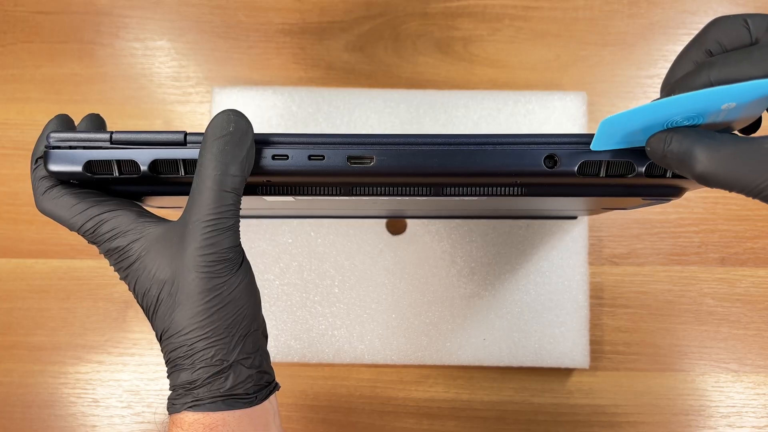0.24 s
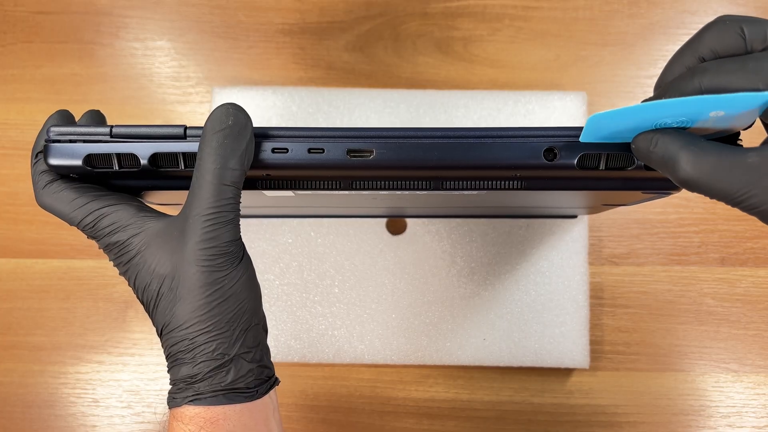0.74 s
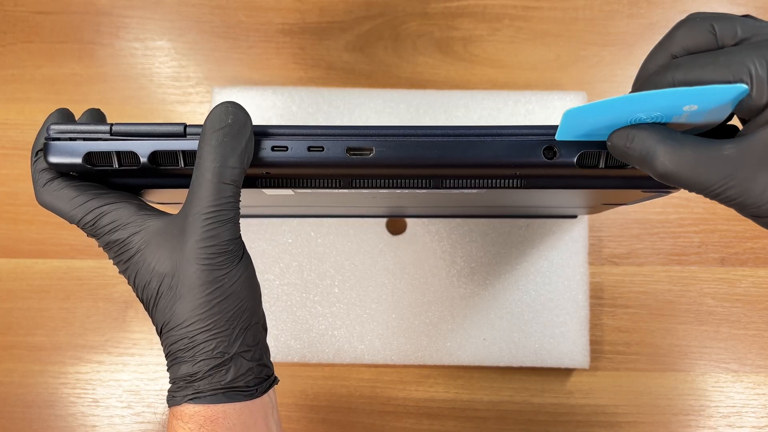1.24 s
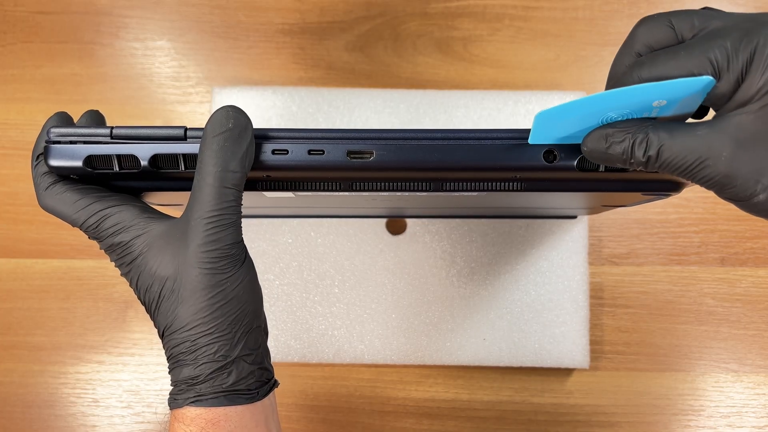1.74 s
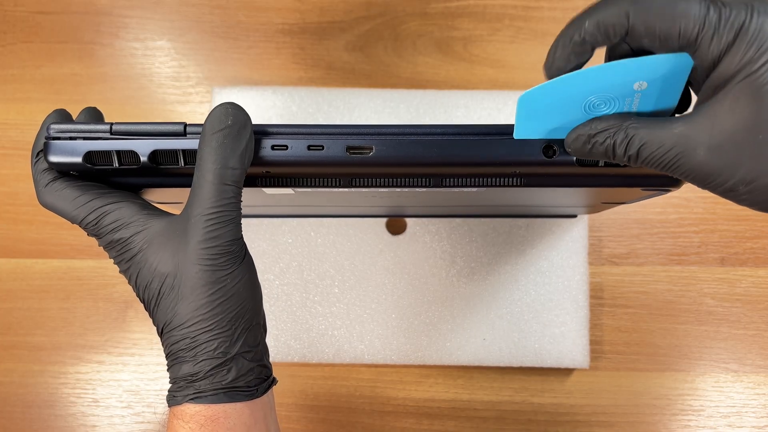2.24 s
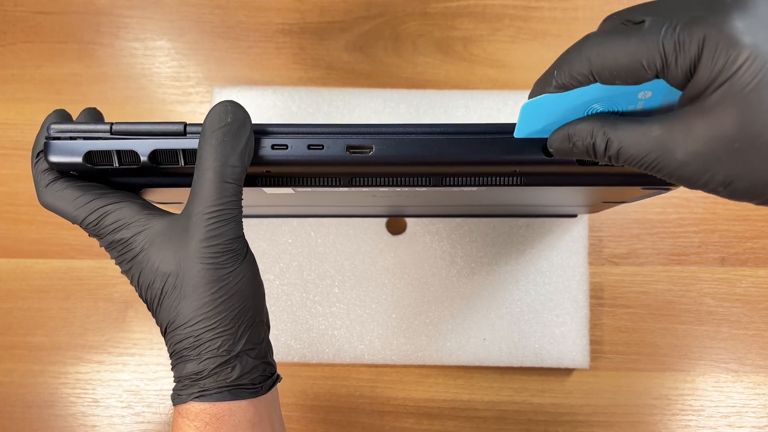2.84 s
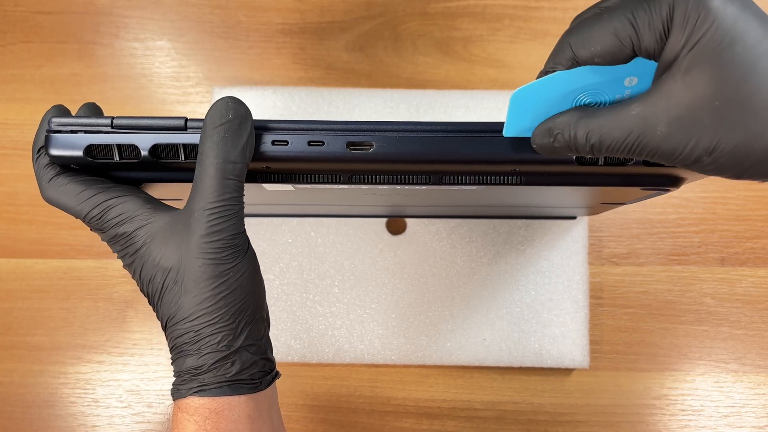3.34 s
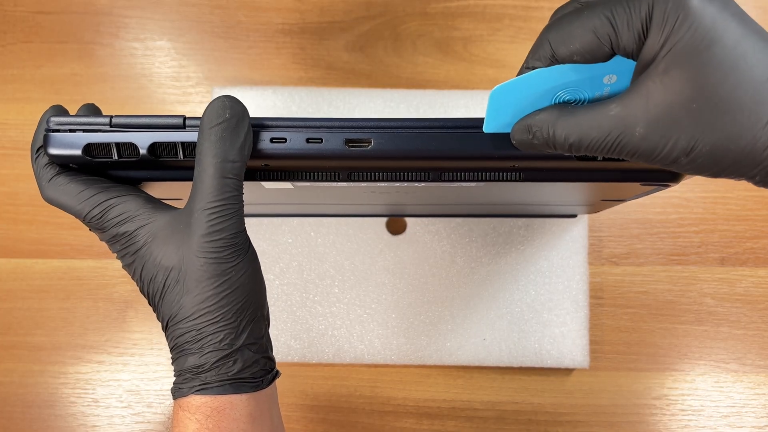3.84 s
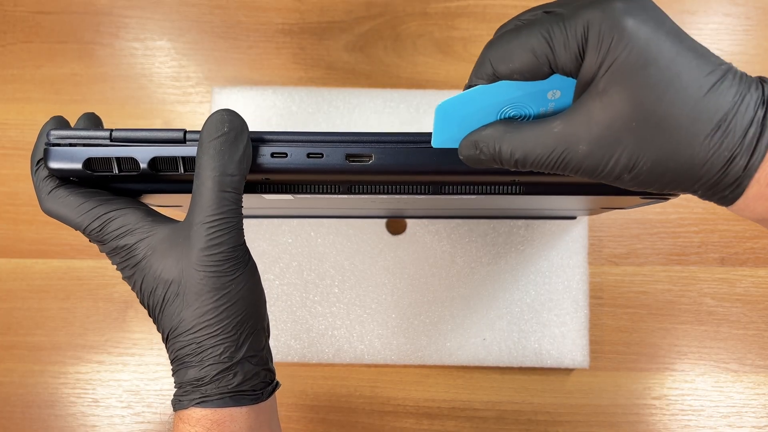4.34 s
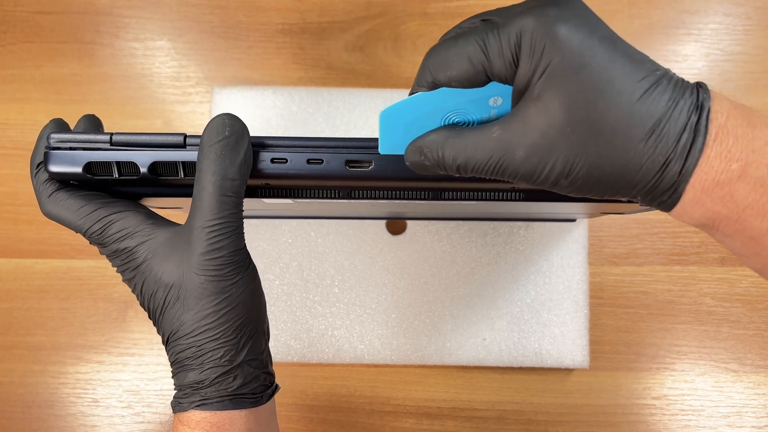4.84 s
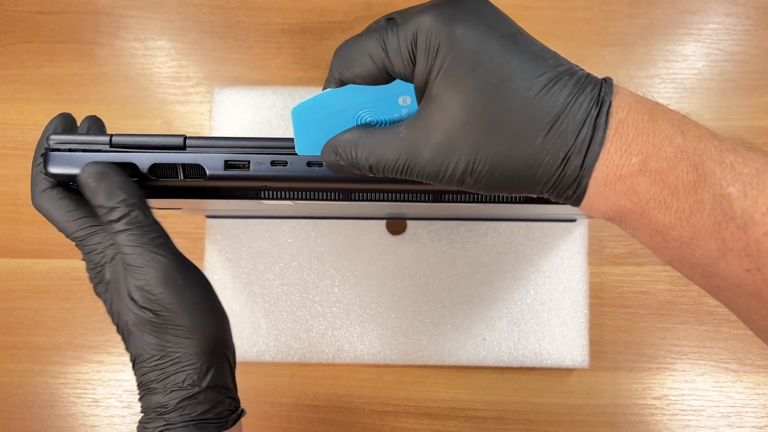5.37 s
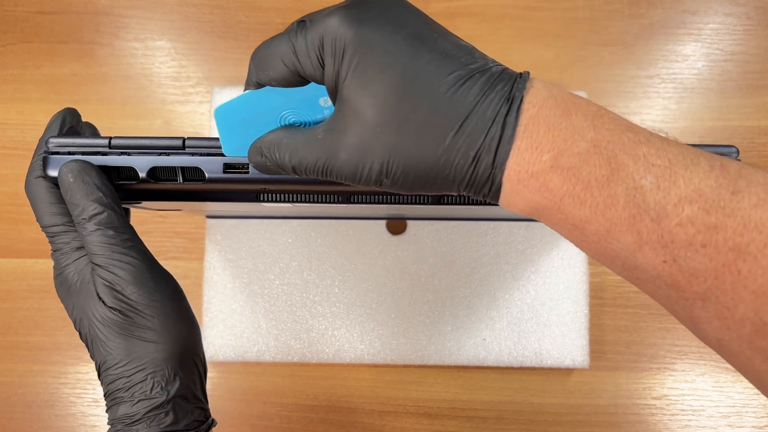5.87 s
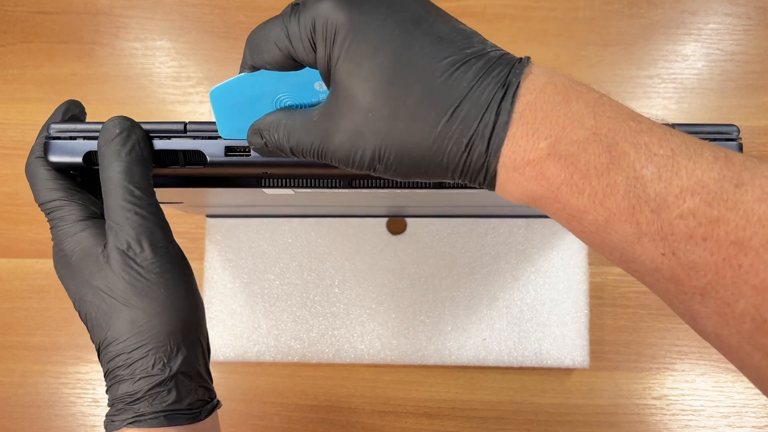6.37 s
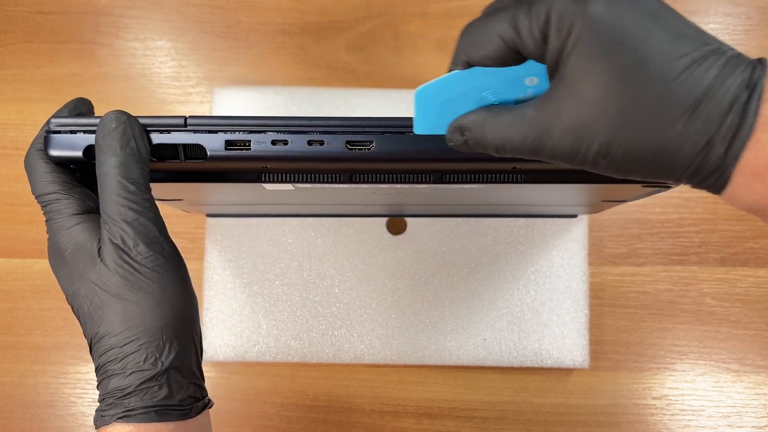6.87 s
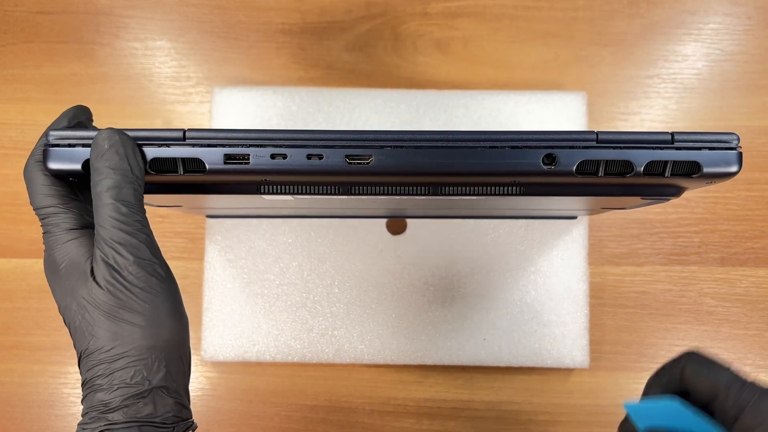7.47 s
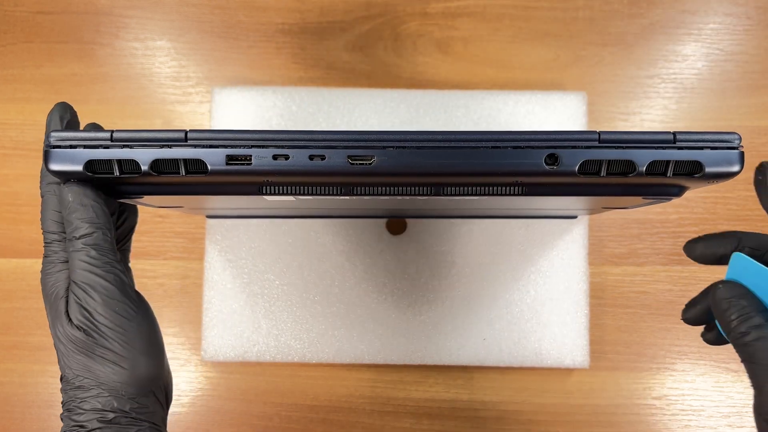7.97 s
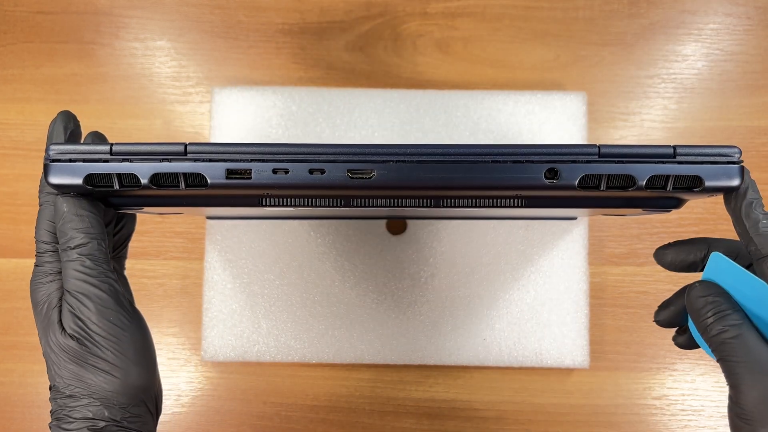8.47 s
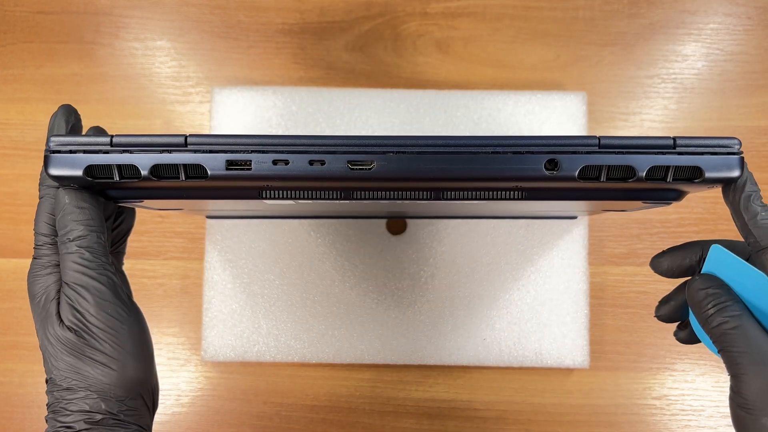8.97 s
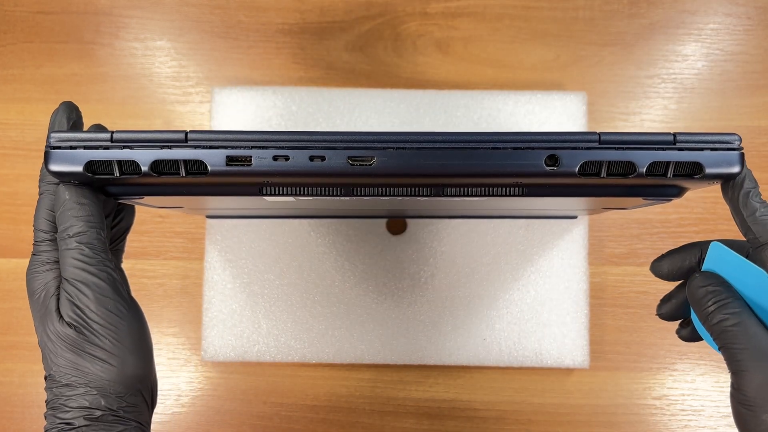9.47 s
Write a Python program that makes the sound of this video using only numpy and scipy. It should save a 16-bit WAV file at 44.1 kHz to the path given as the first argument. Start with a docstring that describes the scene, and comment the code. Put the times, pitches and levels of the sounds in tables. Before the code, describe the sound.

Quiet room tone and light ticks open the scene, with gritty rubbing of plastic, rubber gloves and foam. Clips burst loose in a rapid loud volley, followed by separate hard snaps, the strongest distorting the close microphone and echoing in the room. A short stuttering scrape follows, then rustling dwindles almost to stillness.

```python
"""A plastic pry tool works along the seam of a laptop that stands on foam on a desk, in a bare, lively room.
Room tone and faint friction of resting hands (filtered noise) run throughout; from the start the tool ticks,
and strokes of gritty noise scrape in the seam, rustle as rubber gloves and drag on the foam. Clips snap loose
from 0.48 s, loudest at 3.4, 4.9 and 5.6 s: noise bursts in a resonant shell excite decaying modes and a room
tail, and the loudest are flattened at their peaks. From 6.4 to 7 s the blade chatters; then ever fainter
strokes remain."""
import sys
import numpy as np
from scipy import signal
from scipy.fft import rfft, irfft, next_fast_len
from scipy.io import wavfile
from scipy.ndimage import uniform_filter1d, map_coordinates

SR = 44100
rng = np.random.default_rng(int(sys.argv[2]) if len(sys.argv) > 2 else 0)


def output_pcm(signal):
    """Save a mono or channel-first signal as 16-bit PCM at the path in sys.argv[1].

    Samples are clipped to [-1, 1] before scaling.
    """
    pcm = np.clip(np.atleast_2d(signal).T, -1, 1) * 32767
    wavfile.write(sys.argv[1], SR, np.round(pcm).astype(np.int16))


N = 428211

# Room tone spectrum: (frequency [Hz], relative density [dB per Hz])
AIR_SPECTRUM = [(15, -64), (25, -41.5), (97, -6.5), (130, -4), (170, -16.5), (206, -1.5), (285, -6.5),
                (363, -7.5), (416, -10), (489, -11.5), (714, -12.5), (796, -17), (1130, -28.5), (3620, -28),
                (16000, -39.5)]
AIR_DB = -68

# Strokes of sliding contact, levels before the mix:
# (full level from [s], hold [s], tool scrape [dB], glove rustle [dB], case on foam [dB])
STROKES = [(0.11, 0.044, -71, -94, -56.5), (0.64, 0.01, -77, -92, -64.5), (0.86, 0.0099, -73, -71, -62),
           (1.0, 0.083, -74, -76, -70), (1.18, 0.029, -77, -73, -69), (1.365, 0.0046, -57.5, -56, -64),
           (1.52, 0.013, -69, -73, -59.5), (1.61, 0.087, -64, -62.5, -63), (1.8, 0.016, -69, -62.5, -60),
           (1.89, 0.019, -63, -58.5, -57.5), (2.0, 0.037, -63, -58.5, -58), (2.136, 0.11, -63, -49.5, -65),
           (2.25, 0.021, -47.5, -40.5, -56.5), (2.46, .05, -57, -56.5, -85),
           (2.54, 0.018, -50.5, -57.5, -57.5), (2.734, .02, -59.5, -56.5, -71),
           (2.86, 0.022, -52, -49, -51), (3.016, 0.064, -60, -67, -53.5), (3.17, .01, -68, -60, -79),
           (3.325, 0.014, -59.5, -58, -72), (3.682, 0.0047, -55.5, -56, -47.5),
           (3.814, 0.0056, -55.5, -68.5, -52), (4.04, 0.015, -48.5, -55.5, -54),
           (4.13, 0.037, -54, -62, -53), (4.23, 0.069, -56.5, -62, -60.5), (4.46, 0.082, -51, -55.5, -59.5),
           (4.7, 0.3, -54, -73.5, -49.5), (5.0, 0.24, -46, -52.5, -50), (5.11, 0.025, -40.5, -45, -53),
           (5.28, 0.026, -57.5, -43, -67.5), (5.35, 0.011, -57.5, -60, -69), (5.43, .12, -55.5, -52.5, -71),
           (5.59, .03, -49.5, -47.5, -46), (6.2, 0.06, -68.5, -53, -68), (6.33, 0.19, -75, -55.5, -67.5),
           (6.55, 0.13, -47, -47, -50), (6.68, 0.27, -50.5, -50.5, -55.5), (6.92, 0.072, -41, -44, -53),
           (7.11, 0.044, -51, -49, -56), (7.18, 0.054, -61.5, -55, -63.5), (7.43, 0.044, -56.5, -47, -70),
           (7.5, 0.064, -53.5, -54, -69.5), (7.58, 0.048, -48.5, -47.5, -71), (7.66, .1, -54.5, -53, -64.5),
           (7.84, 0.036, -68, -58.5, -69), (7.9, 0.054, -62.5, -48.5, -68.5),
           (8.12, 0.022, -72.5, -64.5, -74.5), (8.29, 0.024, -73, -66, -74.5),
           (8.44, 0.008, -74.5, -74.5, -73), (8.5, .08, -71.5, -79, -67.5), (8.87, .03, -71, -79.5, -77),
           (9.15, 0.019, -69.5, -90.5, -71), (9.44, 0.018, -75, -74.5, -73.5),
           (9.515, 0.062, -74.5, -80.5, -65)]
# Hands at rest on the case, before the mix, one row each for scrape, rustle and foam: (level [dB])
REST_DB = [
    [-78],
    [-85.5],
    [-79.5],
]
RISE_DB_PER_S, FALL_DB_PER_S = 351, 218  # into and out of a stroke
FLUTTER_DB, FLUTTER_PER_S = 1.5, 25  # unsteady pressure inside a stroke

# Friction spectra of foam, tool and gloves: (frequency [Hz], relative density [dB per Hz])
FOAM_SPECTRUM = [(80, -25), (200, -10), (600, 1), (1200, -3), (2000, -14.5), (4000, -32)]
SCRAPE_SPECTRUM = [(300, -25.5), (800, -10.5), (1500, 0.5), (2500, -1.5), (5000, -8.5), (9000, -23.5)]
RUSTLE_SPECTRUM = [(1500, -33.5), (3500, -1.5), (6000, 2.5), (10000, 1.5), (16000, -3.5)]
# Rumble through foam and desk: (frequency [Hz], relative density [dB per Hz])
RUMBLE_SPECTRUM = [(25, -7), (60, 0), (120, 0.5), (300, -8), (600, -28)]

# Decay of the room: (frequency [Hz], t60 [s])
ROOM_T60 = [(100, 0.72), (400, 0.34), (1100, 0.49), (3000, 0.47), (7700, 0.41), (11000, 0.48),
            (16000, 0.38)]
# Colour of the echo: (frequency [Hz], relative level [dB])
WALL_COLOUR = [(100, 0.5), (500, -1), (1200, 0), (4000, -3), (6000, -2.5), (9000, -2), (12000, -5),
               (16000, -4.5)]

# The tool's edge ticking on the case; treble and thump are relative to the burst:
# (time [s], burst peak [dB], pitch [Hz], treble [dB], thump [dB])
TICKS = [(0.036, -47.5, 1820, 0, -24), (0.111, -38.5, 1240, -32, -38), (0.279, -49.5, 1200, 3.5, -7),
         (0.444, -47.5, 1040, 0, -19), (0.544, -45.5, 1050, -14, -1.5), (1.686, -38.5, 1560, -9, -15),
         (1.798, -47.5, 1410, -13, -30), (1.897, -37.5, 1530, -6, -13), (2.136, -42.5, 1070, 1, -10.5),
         (2.202, -48, 5900, -11, -30), (2.221, -44, 4040, 12, -26), (2.27, -37.5, 2340, -2, -32),
         (2.454, -45.5, 3970, 10, -34), (2.806, -37.5, 3950, 0, -4), (2.811, -31, 1280, -0.5, -11),
         (2.853, -35, 1650, -5, -23), (2.897, -54, 1600, -5, -21), (3.064, -68, 902, -16, -20),
         (3.665, -28, 1010, -19, -34), (3.68, -26, 1710, -14, -43.5), (3.814, -35.5, 2440, -11, -21),
         (5.267, -47.5, 3194, -1.5, -36.5), (5.321, -42.5, 5700, 8, -41.5), (5.42, -43, 6130, 10, -22),
         (6.313, -54, 6000, 11, -27), (6.505, -38.5, 1650, -5, -45), (6.516, -27, 1690, 1, -22.5),
         (6.543, -29.5, 1650, -8, -11), (6.604, -33, 1660, -9, 0.5), (6.845, -34.5, 1700, -13, -9),
         (6.858, -33, 1700, -8, -15), (6.89, -27, 1590, -7.5, -28), (6.921, -27.5, 1540, -21, -38),
         (6.98, -37, 1880, 10.5, -42), (7.009, -27, 2280, -7, -18.5), (7.199, -42.5, 2130, 5.5, -32),
         (7.446, -39, 3330, 1.5, -27), (7.474, -45, 4990, 1, -33), (7.583, -44, 2530, 7, -33),
         (7.942, -42, 1885, -8, -28.5), (8.019, -53, 5800, 10, -27.5), (8.147, -47, 1865, -22, -28.5),
         (8.308, -54.5, 4300, 11.5, -22), (8.6, -57, 1895, -18, -22.5), (9.16, -57.5, 1795, -20, -24),
         (9.52, -56.5, 1197, -17.5, -19)]
TICK_ROOM_DB, TICK_MS, TICK_PANEL_DB = 10.5, 16.3, -24  # the same for every tick
# Clips letting go; every level after the burst peak is relative to it: (time [s], burst peak [dB],
# pitch [Hz], treble [dB], thump [dB], room [dB], length [ms], panel ring [dB])
SNAPS = [(0.483, -23.5, 1970, -6, -43, 9, 31, -27), (0.489, -28, 1130, -3, -16.5, 20.5, 36, -23),
         (3.352, 2.5, 2000, -3, -26, 14.5, 18, -29), (3.371, 3, 3700, -8.5, -43, 15.5, 12, -27),
         (3.385, -8.5, 2030, -13, -46, 18, 20, -30), (3.418, -1.5, 1670, -3, -30.5, 16, 27.3, -28),
         (4.629, -13, 2225, -42, -18, 11.5, 22, -20.5), (4.837, -12, 2800, -11.5, -23.5, 12.5, 17, -18),
         (4.893, -0.5, 1130, -8.5, -15, 12.5, 16.8, -32.5),
         (5.628, 3.5, 1140, -4.5, -18.5, 21, 13.3, -20.5), (6.615, -24, 1040, -19, -15, 11, 36, -15)]
# Bright crack of an impact: (frequency [Hz], relative density [dB per Hz])
CRACK_SPECTRUM = [(300, -30), (1500, -25.5), (4000, 1.5), (8500, 2), (12000, -3.5), (16000, 0)]
# Modes of the loosened panel, then low modes of desk and room: (frequency [Hz], relative level [dB], t60 [s])
PANEL_MODES = [(1025, 0.5, 0.42), (1120, -1, 0.36), (1280, -7.5, 0.24), (1407, -5, 0.085),
               (1650, -15, 0.32), (1860, -10.5, 0.4), (2053, -13.5, 0.35), (2280, -10, .14)]
DESK_MODES = [(101.44, -13.5, 0.62), (140, -17, 0.61), (217, -23.5, 0.32), (276, -17.5, 0.38),
              (342.4, -12, 0.44), (398.3, -13.5, 0.25), (505, -5.5, 0.086), (632, -14, 0.22),
              (771, -11, 0.31)]

# The blade chatters as it slides back along the seam, before the mix: (full level from [s], hold [s], level [dB])
CHATTER = [(6.43, 0.077, -52.5), (6.505, .015, -39.5), (6.545, 0.015, -36), (6.605, 0.035, -37.5),
           (6.66, .11, -52), (6.79, .08, -46), (6.885, .015, -44), (6.92, 0.071, -35)]
CHATTER_RISE_DB_PER_S, CHATTER_FALL_DB_PER_S = 600.5, 500  # the blade bites and lets go faster
# Blade resonances: (frequency [Hz], width before broadening [Hz], relative level [dB])
BLADE_MODES = [(1680, 39, 9), (2210, 21, -19), (3360, 170, -6.5), (4150, 76, -4), (5040, 150, -5)]

TOP_HZ = 16050  # upper band limit


def amp(db):
    """Amplitude ratio: 20 dB is a factor of ten."""
    return 10 ** (np.asarray(db) / 20)


def unit(x):
    """Normalisation to unit root-mean-square amplitude."""
    return x / np.sqrt(np.mean(x ** 2) + 1e-20)


def along(points, hz):
    """Interpolation of (frequency, value) points on a logarithmic frequency axis."""
    f, v = np.transpose(points)
    return np.interp(np.log(hz + 1), np.log(f + 1), v)


def filtered(x, response):
    """Linear filtering: the spectrum is multiplied by a complex frequency response."""
    size = next_fast_len(len(x) + 4096)
    hz = np.fft.rfftfreq(size, 1 / SR)
    return irfft(rfft(x, size) * response(hz), size)[:len(x)]


def coloured(x, spectrum):
    """Spectral shaping to a given density, at unit root-mean-square."""
    return unit(filtered(x, lambda hz: amp(along(spectrum, hz))))


def resonance(f, hz, width):
    """Damped oscillator: unit response at its natural frequency, falling on either side."""
    return 1j * f * width / (hz * hz - f * f + 1j * f * width)


def room_tone():
    """Stationary background: Gaussian noise shaped to the room's spectrum."""
    return amp(AIR_DB) * coloured(rng.standard_normal(N), AIR_SPECTRUM)


def gains(rows, rise_db_per_s, fall_db_per_s):
    """Exponential swell, hold and fade of each stroke; incoherent strokes add in power."""
    t, power = np.arange(N) / SR, 0
    for start, hold, *db in rows:
        rise = rise_db_per_s * (t - start)
        fall = fall_db_per_s * (start + hold - t)
        shape_db = np.minimum(np.minimum(rise, fall), 0)
        power = power + np.outer(amp(db), amp(shape_db)) ** 2
    knots = rng.standard_normal(int(N * FLUTTER_PER_S / SR) + 4)
    flutter_db = FLUTTER_DB * map_coordinates(knots, [t * FLUTTER_PER_S])
    return np.sqrt(power) * amp(flutter_db)


def gritty(per_s, spread_db, life_s, smooth, patchy_db):
    """Stick-slip friction: decaying micro-slips of uneven size modulate noise whose colour drifts in patches."""
    starts = rng.random(N) < per_s / SR
    sizes = starts * amp(spread_db * rng.exponential(size=N))
    decay = np.exp(-1 / (max(life_s, 1e-4) * SR))
    slips = signal.lfilter([1], [1, -decay], sizes)
    noise = signal.stft(rng.standard_normal(N), nperseg=512)[2]
    patches = uniform_filter1d(rng.standard_normal(noise.shape), size=9, axis=0)  # across frequency
    patches = uniform_filter1d(patches, size=14, axis=1)  # across time
    patchy = signal.istft(noise * amp(patchy_db * unit(patches)), nperseg=512)[1][:N]
    return (unit(slips) + smooth) * patchy


def foam_drag(level):
    """Soft friction: sparse, long-lived slips of the case on foam, shaped to low and middle frequencies."""
    grit = gritty(200, spread_db=2.0, life_s=0.005, smooth=1.2, patchy_db=3.5)
    return level * coloured(grit, FOAM_SPECTRUM)


def tool_scrape(level):
    """Hard friction: dense, uneven slips of the tool in the seam, strongest in the middle band."""
    grit = gritty(520, spread_db=2.97, life_s=0.0024, smooth=1.2, patchy_db=4.0)
    return level * coloured(grit, SCRAPE_SPECTRUM)


def glove_rustle(level):
    """Rubber friction: short slips of the gloves, shaped to high frequencies."""
    grit = gritty(440, spread_db=2.0, life_s=0.0015, smooth=1.3, patchy_db=3.0)
    return level * coloured(grit, RUSTLE_SPECTRUM)


def handling_rumble(scrape, rustle):
    """Structure-borne noise: low rumble follows the hand motion by a compressive power law."""
    effort = (scrape + rustle) ** 0.39
    return amp(-44.5) * effort * coloured(rng.standard_normal(N), RUMBLE_SPECTRUM)


def echo():
    """Diffuse reverberation: noise builds up after the first walls and decays at a rate set by frequency."""
    size = SR * 3 // 5
    hz, t, z = signal.stft(rng.standard_normal(size), SR, nperseg=128)
    decay_db = -60 * t / along(ROOM_T60, hz)[:, None]
    z = z * amp(along(WALL_COLOUR, hz)[:, None] + decay_db)
    tail = signal.istft(z, SR, nperseg=128)[1][:size]
    tail = tail * np.clip((np.arange(size) / SR - 0.006) / 0.01, 0, 1)
    return tail / np.linalg.norm(tail)  # unit energy


def rubbing():
    """Superposition of direct friction, its convolution with a room tail, and structure-borne rumble."""
    scrape, rustle, drag = gains(STROKES, RISE_DB_PER_S, FALL_DB_PER_S) + amp(REST_DB)
    friction = foam_drag(drag) + tool_scrape(scrape) + glove_rustle(rustle) + blade_chatter()
    reverberant = signal.fftconvolve(friction, echo())[:N]
    return amp(-3.5) * friction + amp(-17.0) * reverberant + handling_rumble(scrape, rustle)


def shell(f, hz):
    """Thin-shell radiation: a struck resonance over a broad body, inefficient below the lowest mode."""
    body = resonance(f, hz, 0.43 * hz) + amp(-4.5) * resonance(f, 1700, 3500)
    lowest = resonance(f, 680, 830) * 1j * f / 750
    treble_loss = (6500 / (6500 + 1j * f)) ** 3
    return body * lowest ** 2 * treble_loss


def ring(modes, t, strength_db, rough):
    """Modal decay: damped sinusoids, new strengths for every blow; loose contact makes their phase wander."""
    steps = rng.standard_normal((len(modes), len(t)))
    wander = rough * uniform_filter1d(np.cumsum(steps, axis=1), size=600, axis=1)
    blow_db = strength_db + rng.normal(0, 2, len(modes))
    total = 0
    for (hz, db, t60), extra_db, phase in zip(modes, blow_db, wander):
        total = total + amp(db + extra_db - 60 * t / t60) * np.sin(2 * np.pi * hz * t + phase)
    return total


def impact(db, hz, treble_db, thump_db, ms, panel_db):
    """Impulsive excitation: a crack and a burst in the shell set panel and desk modes ringing."""
    t = np.arange(SR // 2) / SR
    short = t[:SR // 10]
    rise = 1 - np.exp(-short / (0.0001 * amp(-0.6 * db)))  # weak impacts start softer

    def fade(share):  # holds, then dies fast: 60 dB down after this share of the length
        return rise * amp(-60 * (short / (share * max(ms, 2) / 1000)) ** 1.97)

    crack = coloured(rng.standard_normal(len(short)), CRACK_SPECTRUM) * fade(0.4)
    burst = filtered(rng.standard_normal(len(short)) * fade(1.01), lambda f: shell(f, hz))
    panel_hz, desk_hz = np.transpose(PANEL_MODES)[0], np.transpose(DESK_MODES)[0]
    near_db = -14 * np.abs(np.log2(panel_hz / hz))  # modes near the pitch are struck hardest
    panel = (1 - np.exp(-t / 0.0014)) * ring(PANEL_MODES, t, near_db, rough=0.16)
    desk_rough = desk_hz[:, None] / 4500  # higher modes wander more
    desk = (1 - np.exp(-t / 0.008)) * ring(DESK_MODES, t, np.zeros(len(DESK_MODES)), desk_rough)
    sound = amp(panel_db) * panel + amp(thump_db) * desk
    sound[:len(short)] += burst / np.abs(burst).max() + amp(treble_db) * crack
    return sound


def impact_room(hz, treble_db):
    """Room response to an impact: a fresh tail takes the source's spectrum and uneven narrow bands."""
    uneven_db = 1.8 * rng.standard_normal(120)  # each impact favours its own narrow bands
    band_hz = np.linspace(0, SR / 2, len(uneven_db))

    def response(f):
        source = np.abs(shell(f, hz)) + amp(treble_db - 9 + along(CRACK_SPECTRUM, f))
        return amp(np.interp(f, band_hz, uneven_db)) * source

    return filtered(echo(), response)


def ticks_and_snaps():
    """Superposition of impacts: ticks of the tool's edge and clip releases, each with its room tail."""
    out = np.zeros(N + 2 * SR)
    ticks = [(*row, TICK_ROOM_DB, TICK_MS, TICK_PANEL_DB) for row in TICKS]
    for s, db, hz, treble_db, thump_db, room_db, ms, panel_db in ticks + SNAPS:
        at = round(s * SR)
        direct = impact(db, hz, treble_db, thump_db, ms, panel_db)
        out[at:at + len(direct)] += amp(db) * direct
        tail = impact_room(hz, treble_db)
        out[at:at + len(tail)] += amp(db + room_db) * tail
    return out[:N]


def blade_chatter():
    """Friction-driven resonance: coarse slips excite blade modes of alternating sign."""
    def blade(f):
        return sum((-1) ** k * amp(db) * resonance(f, hz, 3.3 * width)
                   for k, (hz, width, db) in enumerate(BLADE_MODES))

    level = gains(CHATTER, CHATTER_RISE_DB_PER_S, CHATTER_FALL_DB_PER_S)[0]
    grit = gritty(300, spread_db=3, life_s=0.0035, smooth=0.18, patchy_db=2.0)
    return level * unit(filtered(grit, blade))


def scene():
    """Linear superposition of room tone, friction and impacts in one channel."""
    return (room_tone() + rubbing() + ticks_and_snaps())[None]


def record(dry):
    """Saturation and band limiting: the input overloads towards 0.9, then deep bass and top are cut."""
    clipped = dry[0] / (1 + np.abs(dry[0] / 0.9) ** 6) ** (1 / 6)

    def band(hz):
        bass_cut = (1j * hz / (55 + 1j * hz)) ** 2
        return np.clip((TOP_HZ - hz) / 300, 0, 1) * bass_cut

    return filtered(clipped, band)[None]


dry = scene()
out = record(dry)
output_pcm(out)
```